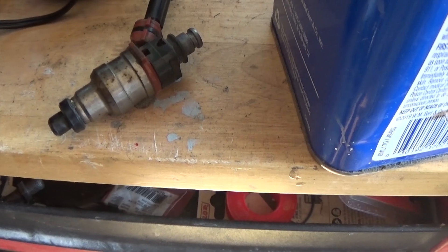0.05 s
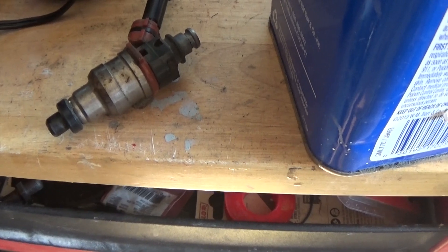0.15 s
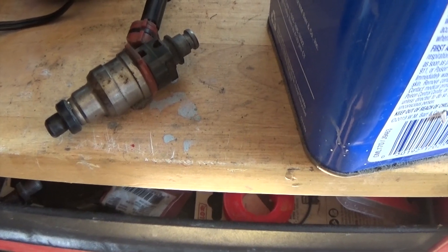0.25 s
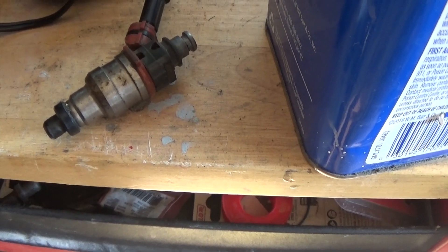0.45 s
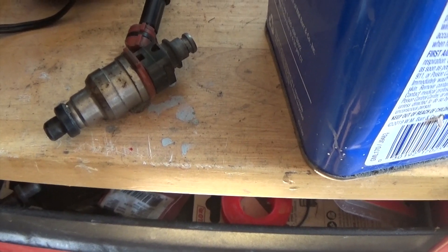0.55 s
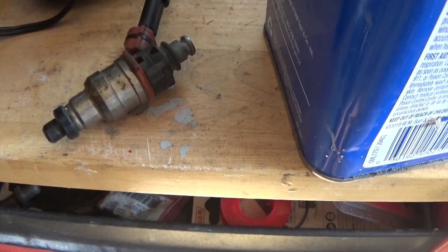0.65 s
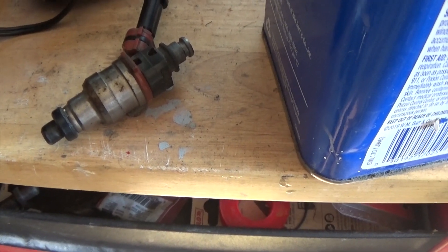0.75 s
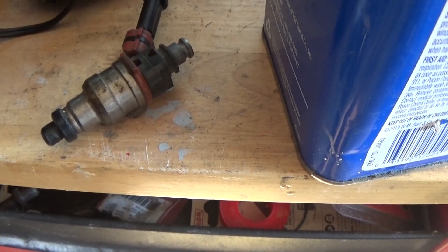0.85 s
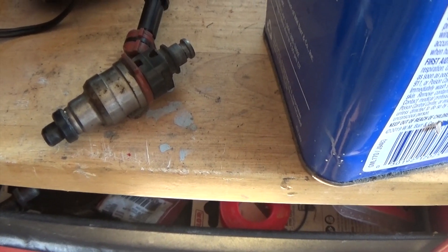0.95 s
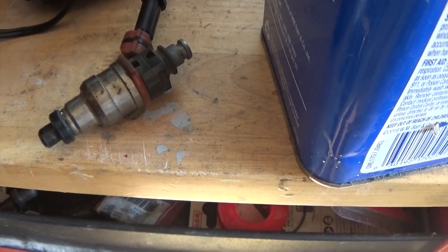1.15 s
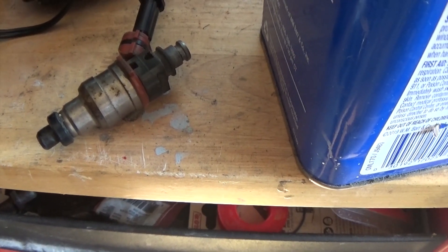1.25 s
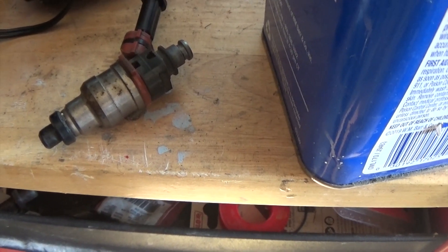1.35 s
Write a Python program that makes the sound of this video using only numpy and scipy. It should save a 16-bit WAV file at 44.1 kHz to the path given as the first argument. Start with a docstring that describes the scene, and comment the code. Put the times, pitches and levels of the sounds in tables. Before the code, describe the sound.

A fuel injector gives three sharp double clicks close up, at about 0.2, 0.6 and 1.1 seconds, snapping open and then shut roughly a twentieth of a second later. Each click has a faint steel ring, a slight wooden bench thud and a very short room echo. A faint thin hiss at about 0.9 seconds leads into the last pair. Quiet room tone and a low hum continue underneath.

```python
"""A small workshop, two microphones close to a wooden bench where a bare fuel injector lies by a tin can.
Pulsed three times from a battery, it gives two sharp clicks a pulse: the needle snaps open against
its stop, then the spring throws it back on its seat. The steel rings faintly, the bench thuds and
the room answers briefly. A thin hiss leads into the third pulse; room tone and a low hum lie behind."""
import sys
import numpy as np
from scipy import signal
from scipy.fft import rfft, irfft
from scipy.io import wavfile

SR = 44100
rng = np.random.default_rng(int(sys.argv[2]) if len(sys.argv) > 2 else 0)


def unload_wav(signal):
    """Save mono or channel-first audio to the path in sys.argv[1] as 16-bit WAV at rate SR, clipped to [-1, 1]."""
    wavfile.write(
        sys.argv[1],
        SR,
        np.round(np.clip(np.atleast_2d(signal).T, -1, 1) * 32767).astype(np.int16),
    )


N = 61739
TIME = np.arange(N) / SR
FREQS = np.maximum(np.fft.rfftfreq(2 * N, 1 / SR), 1)
SIDES = np.array([[.5], [-.5]])   # shares a left-minus-right value between the channels
OPENING, CLOSING = 0, 1   # the needle's stroke; picks a level column in the mode tables


def injector():
    """Close up: the needle's opening clicks with their high zing, its closing clicks, and the ping."""
    # needle hits its stop: t/s, click level/dB, zing level/dB
    openings = [(0.203, 0, -42), (0.6311, 0, -29), (1.0599, -1, -25)]
    # needle hits its seat: t/s, click level/dB, ping level/dB
    closings = [(0.2406, -0.5, -5), (0.6895, -0.5, 1.5), (1.1202, 0, -2.5)]
    # spectrum of the room's answer to each stroke: f/Hz, relative level/dB
    open_echo = [(300, -32), (2000, -23), (2600, -13), (3000, -24.5), (3400, -2), (4100, -2), (4700, -9),
                 (5600, -4.5), (6550, 3), (7200, -13), (8200, -8), (10200, -6.5), (12000, -12.5),
                 (15500, -17.5)]
    close_echo = [(300, -25.5), (2000, -27), (2600, -12.5), (3100, -3.5), (4000, -4.5), (5100, -19.5),
                  (5800, -3.5), (6400, 2), (7400, -17), (8600, -12.5), (9850, -4), (11300, -15),
                  (12200, -16), (15500, -25)]
    open_s, open_db, zing_db = np.transpose(openings)
    close_s, close_db, ping_db = np.transpose(closings)
    zing = radiated(ring(blows(open_s, zing_db), hz=10180, t60=0.025), order=2)
    opening = needle(open_s, open_db, OPENING, open_echo, echo_db=-35.5) + zing
    closing = needle(close_s, close_db, CLOSING, close_echo, echo_db=-38.5)
    return opening + closing + ping(open_s, open_db, close_s, ping_db)


def needle(times, db, stroke, echo, echo_db):
    """The needle strikes and rebounds once: body click, steel rings, bench thud and the room's answer."""
    # damped modes of the injector body: f/Hz, t60/s, opening level/dB, closing level/dB
    body_modes = [(2617, 0.0033, -14.5, -19.5), (3137, 0.0029, -8.5, -7), (4226, 0.0049, -6.5, -11.5),
                  (4557, 0.0084, -21.5, -39), (6000, 0.0038, -60, -12), (6035, 0.018, -28, -20),
                  (6400, 0.019, -28, -38), (7944, 0.0094, -19.5, -25.5), (8570, 0.013, -26, -31.5),
                  (9860, 0.0069, -18.5, -16), (10800, 0.0076, -22.5, -51), (11840, .008, -24, -26.5),
                  (13400, 0.0062, -21, -21.5), (15500, .004, -26, -37)]
    # long, faint rings of the steel: f/Hz, t60/s, opening level/dB, closing level/dB
    ring_modes = [(3958, 0.14, -59, -51), (4046, 0.082, -58, -64), (5797, 0.35, -70, -49),
                  (5961, 0.13, -56, -68), (6340, 0.042, -48, -47), (6580, 0.1, -55, -61),
                  (8500, 0.19, -60, -56), (9598, 0.16, -59, -56), (11500, .16, -66, -60)]
    bounce_s, bounce_db = .00066, -15
    click = struck(body_modes, times, db, stroke)
    rebound = from_db(bounce_db) * np.pad(click, (round(bounce_s * SR), 0))[:N]
    rings = struck(ring_modes, times, db, stroke)
    steel = radiated(click + rebound + rings, order=6)
    return microphones(steel) + bench(times, db, stroke) + workshop(blows(times, db + echo_db), echo)


def ping(open_s, open_db, close_s, close_db):
    """The steel's lowest ring: one pitch with the needle held open, slightly higher once it is seated."""
    open_hz, seated_hz, t60, damp_s = 2923, 2936, 0.35, 0.0046
    tone = ring(blows(close_s, close_db - 49.5), seated_hz, t60)
    for start, end, db in zip(open_s, close_s, open_db):
        held = np.exp(-np.maximum(TIME - end, 0) / damp_s)   # the closing needle stops the open ring
        tone = tone + held * ring(blows(start, db - 43), open_hz, t60)
    return microphones(radiated(tone, order=4))


def bench(times, db, stroke):
    """The wooden top under the injector thuds at each blow."""
    # modes of the bench top: f/Hz, t60/s, opening level/dB, closing level/dB
    bench_modes = [(358.6, 0.13, -66, -56), (422, 0.29, -64.5, -57.5), (618, 0.027, -57.5, -48.5),
                   (754, 0.03, -72, -52), (1280, 0.036, -61, -55.5), (1827, 0.0027, -55, -66)]
    return struck(bench_modes, times, db, stroke)


def hiss():
    """A brief, thin hiss in the centre, perhaps the wire sliding on the battery terminal."""
    # swell of the hiss: t/s, level/dB
    swell = [(.905, -97), (.925, -65), (.98, -68.5), (1.04, -61), (1.07, -66), (1.1, -90)]
    band = butter(rng.standard_normal(N), [5900, 7230], "band", order=3)
    return rms_one(band) * from_db(np.interp(TIME, *np.transpose(swell)))


def workshop(clicks, spectrum):
    """Near reflections off the bench and the can, then a short room tail whose treble dies first."""
    width, rise_s, near_db, treble_hz = 0.34, .0006, 5.5, 6900
    mid, side = noise(spectrum), width * noise(spectrum)
    wash = np.array([mid + side, mid - side])
    low = colour(wash, [(treble_hz / 2, 0), (treble_hz, -1), (2 * treble_hz, -20)])
    near = from_db(near_db) * wash * decay(t60=.026)
    tail = low * decay(t60=0.16) + (wash - low) * decay(t60=0.14)
    response = (near + tail) * (1 - np.exp(-TIME / rise_s))
    return signal.fftconvolve(clicks[None], response, axes=1)[:, :N]


def room_tone():
    """The workshop's steady noise, a little stronger in the right microphone."""
    # spectrum of the room tone: f/Hz, relative level/dB
    air = [(25, -36), (45, -27), (60, -6), (80, -17), (120, -8.5), (190, -11), (280, -7), (450, -3.5),
           (650, -2), (1000, -3), (1600, -5.5), (2500, -8.5), (5000, -13), (10000, -19), (15500, -22.5)]
    # its stereo width: f/Hz, side minus mid level/dB
    air_width = [(60, -33), (125, -24), (250, -11.5), (500, -8.5), (1200, -4), (3000, -5), (6000, -6),
                 (12000, -24)]
    level_db, pan_db = -60.5, -1.2
    mid, side = noise(air), colour(noise(air), air_width)
    return from_db(level_db + pan_db * SIDES) * np.array([mid + side, mid - side])


def hum():
    """A low hum in the room; each of its tones wavers on its own."""
    # tones of the hum: f/Hz, rms level at the start/dB, rms level at the end/dB
    hum_tones = [(58, -83, -88.5), (108.6, -75.5, -74), (116, -82.5, -71), (147, -74, -85),
                 (236.6, -85.5, -77), (326.5, -78, -78)]
    waver_depth, waver_hz = 0.49, 4.8
    total = 0
    for hz, first_db, last_db in hum_tones:
        waver = 1 + waver_depth * noise([(waver_hz, 0), (10 * waver_hz, -60)])
        tone = np.sin(2 * np.pi * (hz * TIME + rng.random()))
        total = total + from_db(np.linspace(first_db, last_db, N)) * rms_one(waver * tone)
    return total


def microphones(x):
    """The close pair hears the steel at a slightly different level and phase on each side."""
    # balance of the pair: f/Hz, left minus right level/dB
    balance = [(2500, -0.7), (4400, -1), (8000, 2.2), (15000, 1.0)]
    # phase across the pair: f/Hz, lead of the left/rad
    phase = [(2500, 0.34), (3450, -0.44), (4820, 0.82), (5170, -0.19), (5860, 1), (6120, -1.6), (6400, 1),
             (9040, -0.49), (11200, 0.058), (16000, .1)]
    pan_db = np.interp(FREQS, *np.transpose(balance))
    lead = np.interp(FREQS, *np.transpose(phase))
    return irfft(rfft(x, 2 * N) * from_db(SIDES * pan_db) * np.exp(1j * SIDES * lead))[:, :N]


def radiated(x, order):
    """So small a body radiates little below 2300 Hz."""
    return butter(x, 2300, "high", order)


def struck(modes, times, db, stroke):
    """Modes of alternating sign; each blow stirs them a little differently."""
    spread_db = 0.9
    total = 0
    for k, (hz, t60, *levels) in enumerate(modes):
        blow_db = db + levels[stroke] + spread_db * rng.standard_normal(len(times))
        total = total + (-1) ** k * ring(blows(times, blow_db), hz, t60)
    return total


def blows(times, db):
    """One impulse for each blow."""
    impulses = np.zeros(N)
    impulses[np.round(times * SR).astype(int)] = from_db(db)
    return impulses


def ring(clicks, hz, t60):
    """A unit impulse starts a decaying sine of height 1."""
    radius, angle = from_db(-60 / (t60 * SR)), 2 * np.pi * hz / SR
    return signal.lfilter([0, np.sin(angle)], [1, -2 * radius * np.cos(angle), radius ** 2], clicks + 1e-18)


def decay(t60):
    """An envelope that falls 60 dB in t60 seconds."""
    return from_db(-60 * TIME / t60)


def noise(points):
    """Coloured noise of rms 1."""
    return rms_one(colour(rng.standard_normal(N), points))


def colour(x, points):
    """Filter by a table of f/Hz, level/dB."""
    hz, db = np.transpose(points)
    gain = from_db(np.interp(np.log(FREQS), np.log(hz), db))
    return irfft(rfft(x, 2 * N) * gain)[..., :N]


def butter(x, hz, kind, order):
    """Causal Butterworth filter."""
    return signal.sosfilt(signal.butter(order, hz, kind, fs=SR, output="sos"), x)


def from_db(db):
    """Decibels to gain."""
    return 10 ** (np.asarray(db) / 20)


def rms_one(x):
    """Scale to rms 1."""
    return x / np.sqrt(np.mean(x ** 2) + 1e-20)


def scene():
    """The injector close in front, the workshop behind it."""
    return injector() + hiss() + room_tone() + hum()


def record(dry):
    """The recorder cuts the treble above 16.1 kHz."""
    return signal.sosfilt(signal.ellip(10, .1, 80, 16100, fs=SR, output="sos"), dry)


dry = scene()
out = record(dry)
unload_wav(out)
```